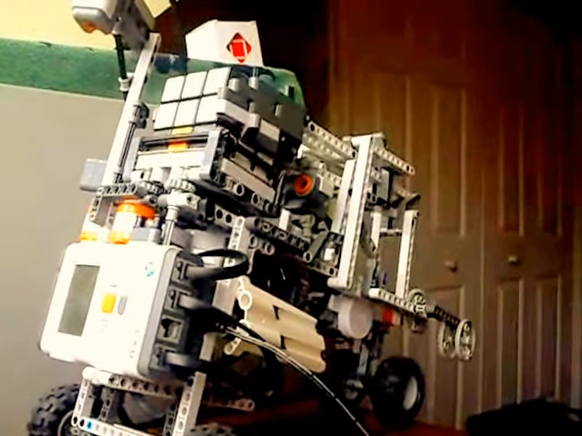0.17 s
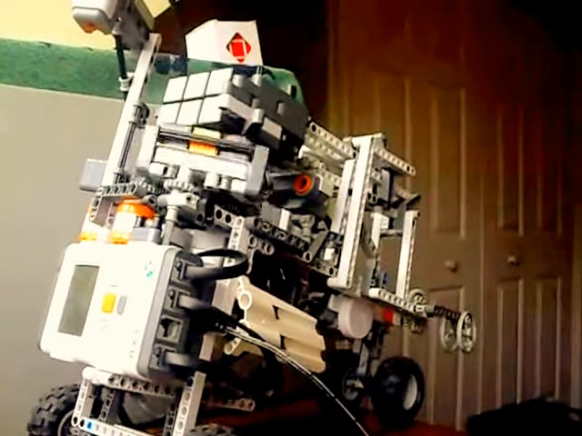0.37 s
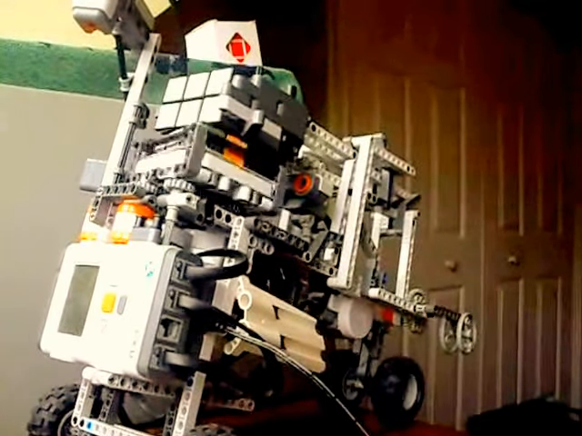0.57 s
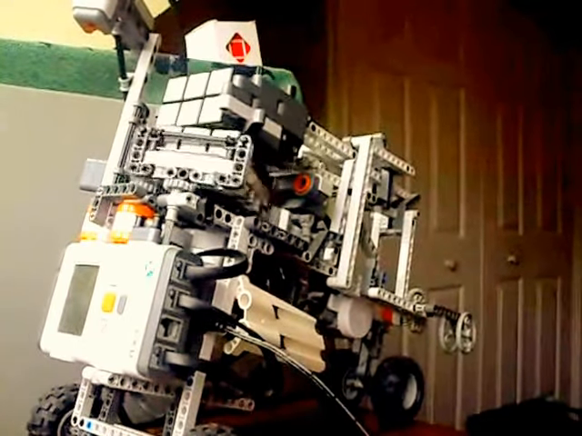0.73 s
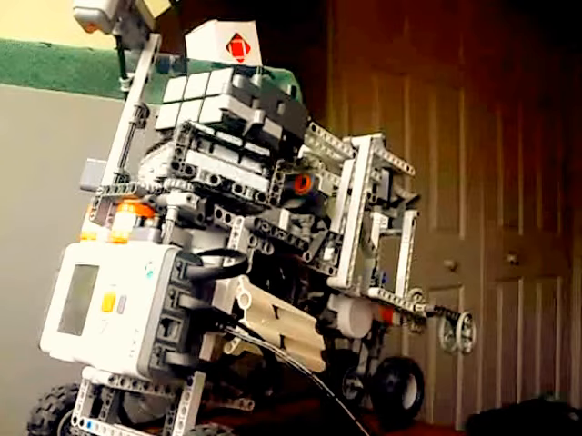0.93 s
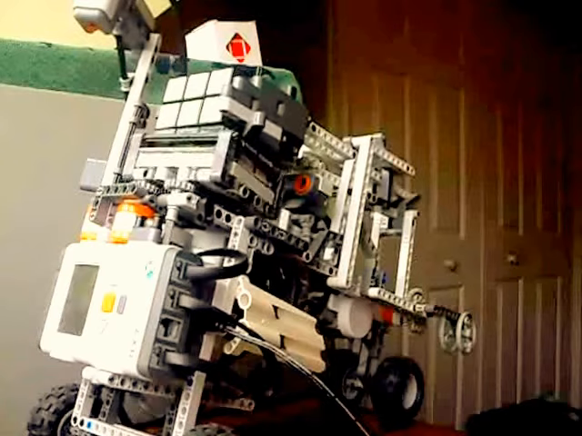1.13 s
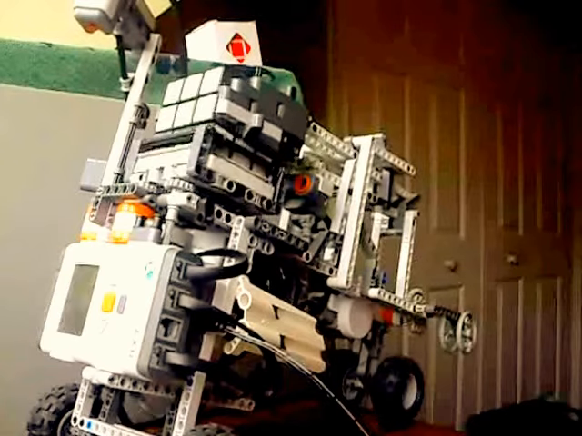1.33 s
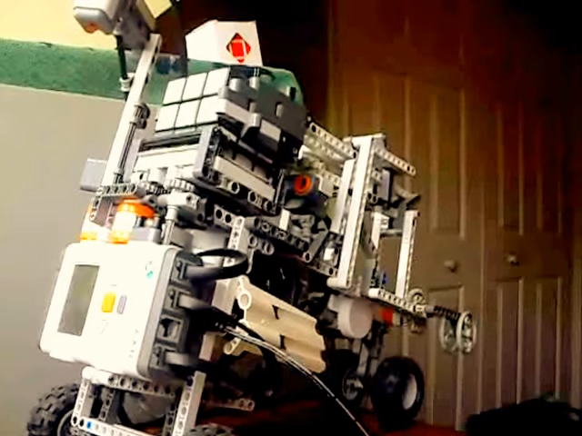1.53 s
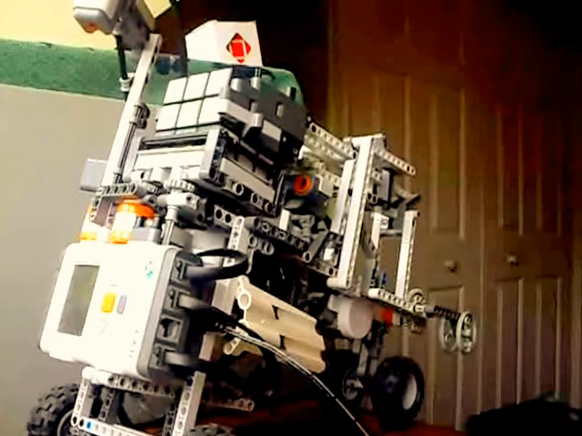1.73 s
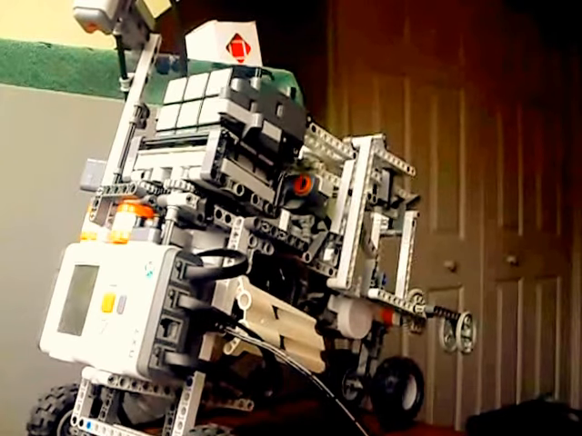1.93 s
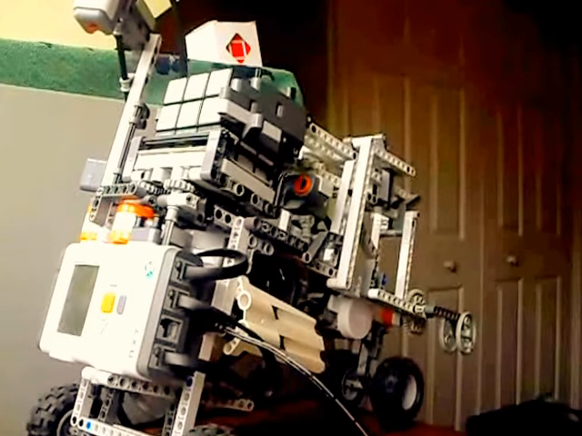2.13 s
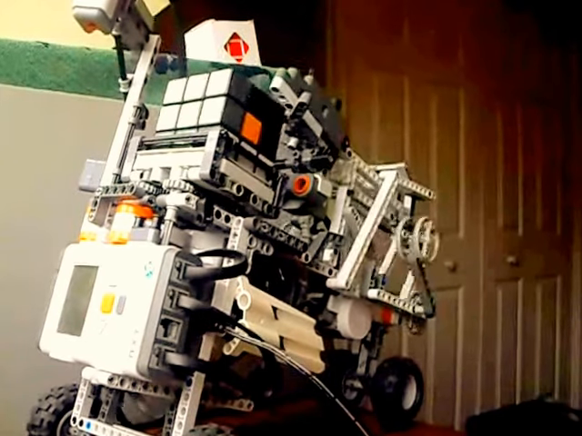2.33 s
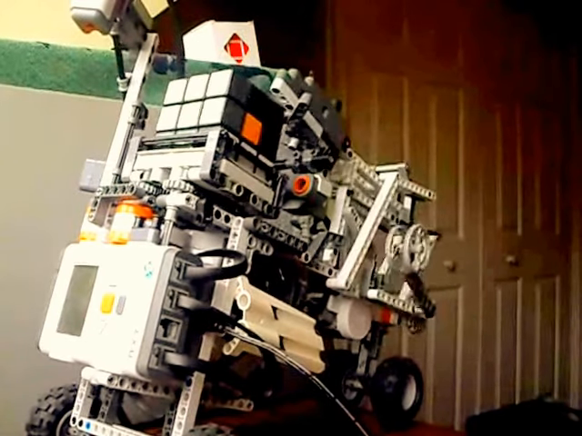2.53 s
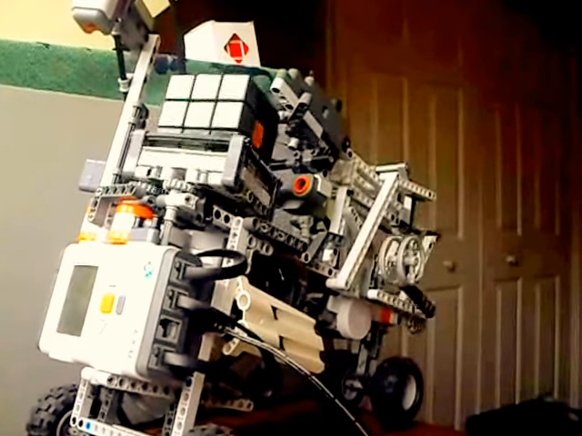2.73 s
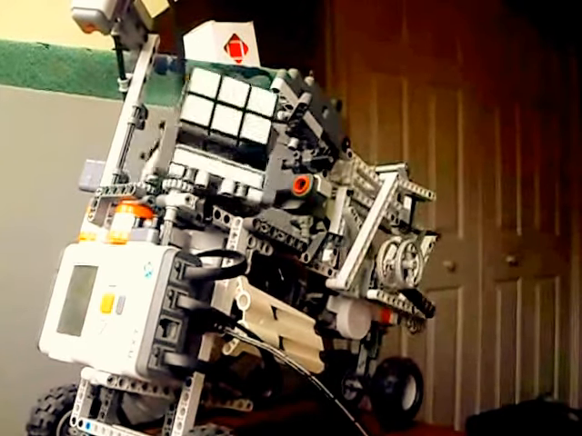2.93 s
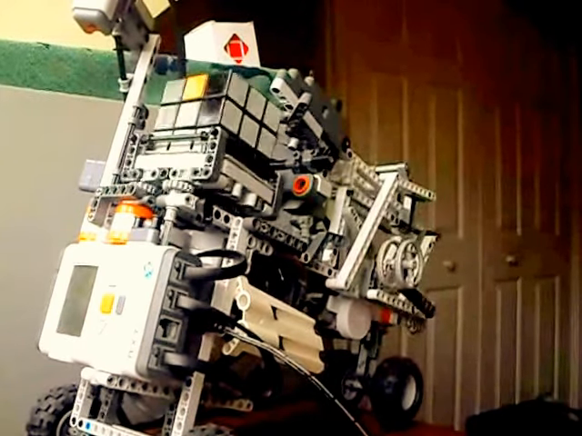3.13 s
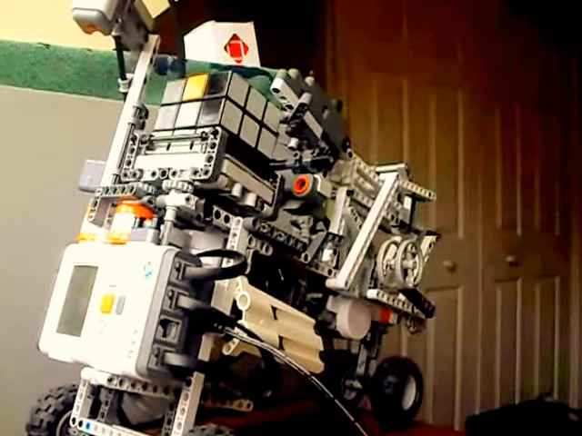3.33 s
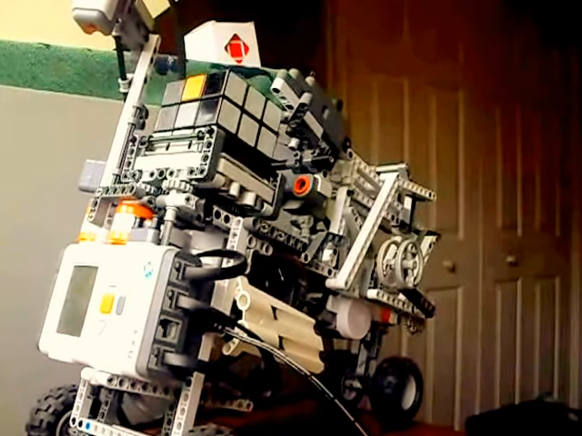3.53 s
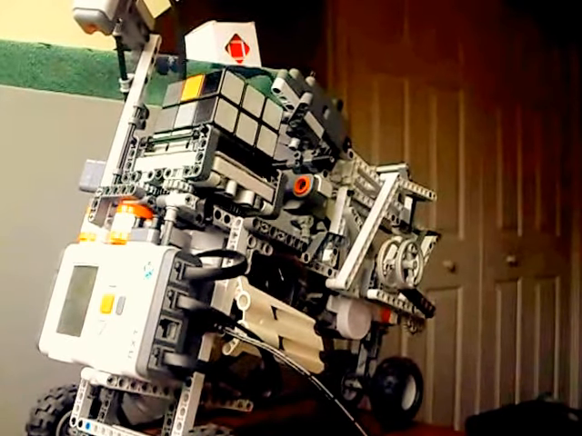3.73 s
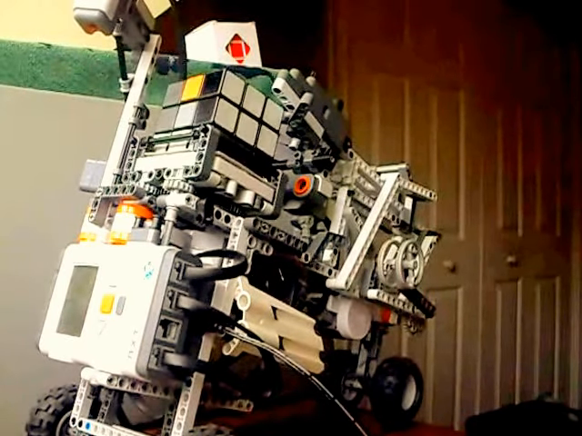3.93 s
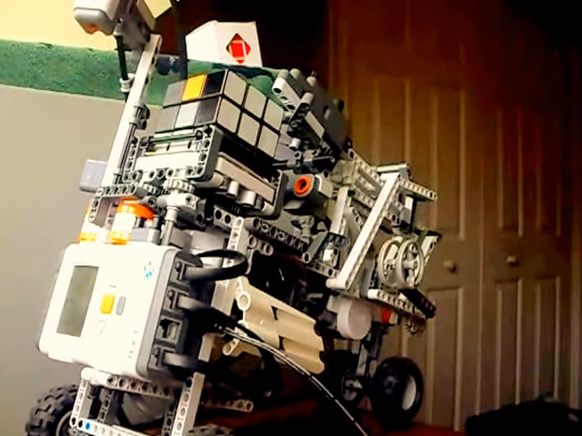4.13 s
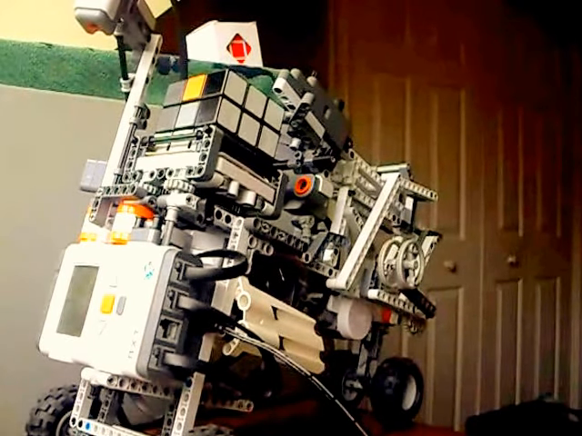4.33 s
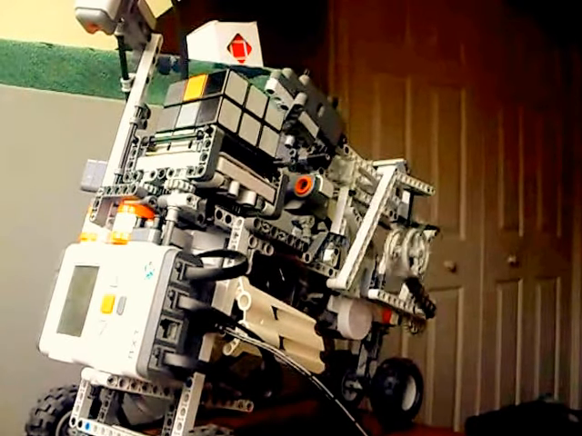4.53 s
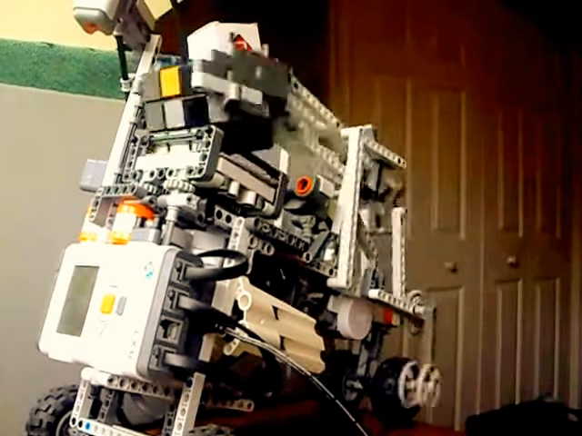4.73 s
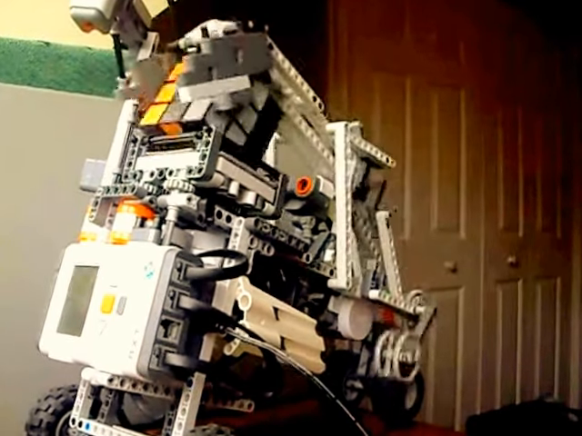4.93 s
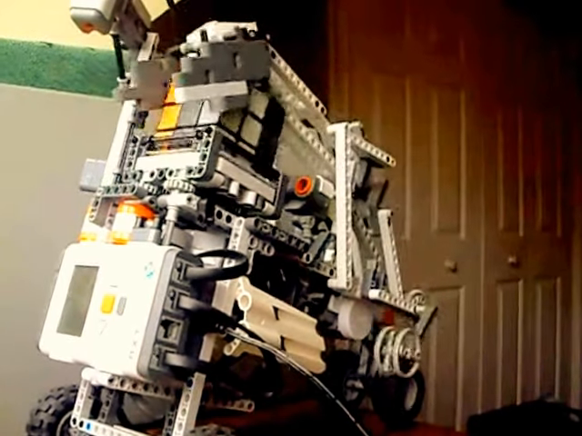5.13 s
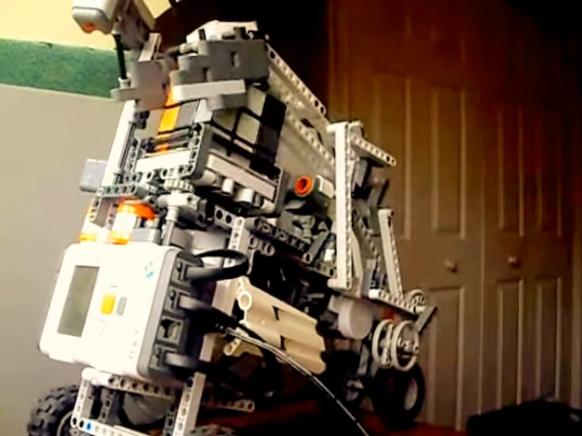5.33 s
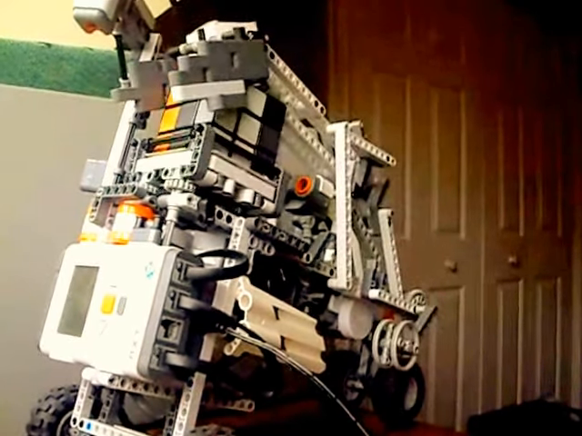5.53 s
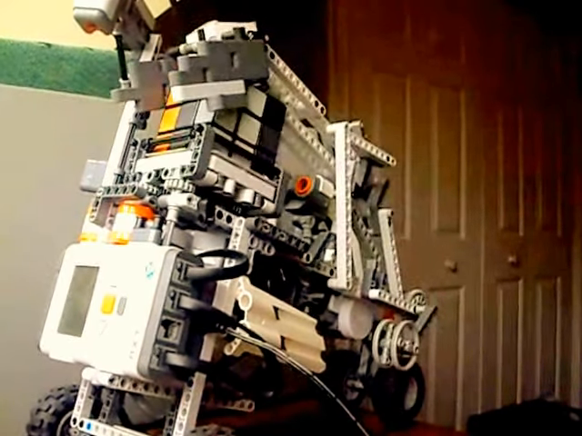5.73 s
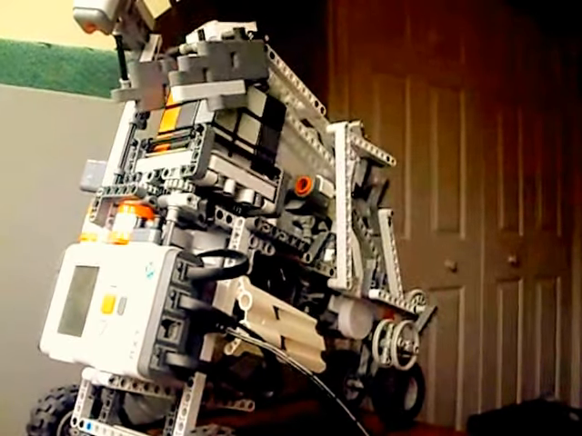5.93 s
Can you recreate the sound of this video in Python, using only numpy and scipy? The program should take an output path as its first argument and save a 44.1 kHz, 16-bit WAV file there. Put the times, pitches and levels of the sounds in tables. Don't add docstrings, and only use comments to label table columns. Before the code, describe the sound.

In a quiet room with a short, dry echo, a close microphone picks up a plastic robot turning a puzzle cube over a low steady hiss. At 0.2 s a small servo starts, rises quickly in pitch and sings with a rattling gear whir, jolting softly near 0.36 and stopping with a light thud around 1.15. Short whirs and clicks follow at 1.2, 1.45 and 1.75; the arm rustles and grinds faintly from 1.95 to 2.6. A second, more rattling and less tonal whir runs from 2.68 to 3.23, with loud clicks at 2.82, 2.87 and 2.96. Faint nudges, ticks and tiny high chirps fill 3.3 to 4.4. From 4.5 to 5.2 the arm grinds harder, with sharp clacks near 4.71 and 5.17 as the cube is tipped and seated. Brief whirs and clicks continue from 5.3, the last and strongest near 6.0.

```python
import sys
import numpy as np
from scipy import signal
from scipy.fft import rfft, irfft
from scipy.io import wavfile
from scipy.ndimage import uniform_filter1d

SR = 44100
rng = np.random.default_rng(int(sys.argv[2]) if len(sys.argv) > 2 else 0)


def bounce(signal):
    frames = np.transpose(np.atleast_2d(signal))
    limited = np.clip(frames, -1, 1)
    pcm = np.round(limited * 32767).astype(np.int16)
    wavfile.write(sys.argv[1], SR, pcm)


def voltage_ratio(level):
    return 10 ** (np.asarray(level, float) / 20)


N = 267246
T = np.arange(N) / SR

# time_s, speed_hz (turns per s), rattle_db
FIRST_RUN = [
    (0.185, 52, -41.5),
    (0.241, 70.6, -33),
    (.29, 84, -32),
    (.36, 91.76, -32.5),
    (0.471, 95.7, -33.5),
    (.69, 97.75, -35.5),
    (.86, 98.6, -35),
    (1.08, 97.13, -34.5),
    (1.147, 96.5, -35.5),
]
SECOND_RUN = [
    (2.687, 59.8, -35.5),
    (2.715, 65.7, -39),
    (2.77, 82.1, -36),
    (2.81, 86.2, -37),
    (2.88, 89.7, -36.5),
    (2.999, 92.6, -36.5),
    (3.14, 95.3, -35.5),
    (3.18, 92.3, -42),
    (3.235, 89.8, -49),
]
# mesh_tone_db, low_housing_db, high_housing_db, growth_db_per_s (of both housing boosts)
RUN_LOADS = [
    (-41.5, 0.3, 5.6, 2),
    (-53, 3, 5.5, 6),
]


def rms_one(x):
    return x / np.sqrt(np.mean(x ** 2) + 1e-20)


def resonate(x, hz, width_hz):
    r = np.exp(-np.pi * width_hz / SR)
    return signal.lfilter([(1 - r * r) / 2, 0, -(1 - r * r) / 2], [1, -2 * r * np.cos(2 * np.pi * hz / SR), r * r], x)


def wander(hz, width_hz):
    return rms_one(resonate(rng.standard_normal(N), hz, width_hz))


def hiss():
    # frequency_hz, level_db
    spectrum = [(8.8, -32), (15, 5.5), (102, -3.5), (366, -12), (778, -18.5), (953, -21), (1470, -25),
                (2630, -30), (2960, -30.5), (3840, -31.5), (4850, -34.5), (13000, -39.5), (15500, -36.5)]
    hz = np.fft.rfftfreq(N, 1 / SR)
    at_hz, at_db = np.transpose(spectrum)
    shape = voltage_ratio(np.interp(np.log(hz + 1e-9), np.log(at_hz), at_db))
    return voltage_ratio(-46) * rms_one(irfft(rfft(rng.standard_normal(N)) * shape, N))


def grains(per_s, spread_db):
    sizes = voltage_ratio(spread_db * np.minimum(rng.exponential(1, N), 4)) * rng.choice([-1, 1], N)
    return rms_one(sizes * (rng.random(N) < per_s / SR)) + 1e-18


def housing(x, body, moves, main_share=1, low_hz=3300, high_hz=5600):
    fine = 0.52 * x + 0.49 * rng.standard_normal(N)
    parts = []
    for k, (hz, width_hz, db) in enumerate(body):
        source = x if hz < 8800 else fine
        parts.append((hz, voltage_ratio(db) * (-1) ** k * resonate(source, hz, width_hz)))
    low = sum(part for hz, part in parts if hz < low_hz)
    low = low + voltage_ratio(-15.5) * resonate(x[::-1], 3350, 450)
    sides = sum(part for hz, part in parts if low_hz <= hz < 3300)
    main = sum(part for hz, part in parts if hz >= 3300)
    high = sum(part for hz, part in parts if hz >= high_hz)
    level, low_gain, high_gain = uniform_filter1d(voltage_ratio(moves), size=120)
    tilted = main_share * (main - high) + low_gain * low + high_gain * (high + sides)
    no_bass = signal.butter(3, 850, "high", fs=SR, output="sos")
    return signal.sosfilt(no_bass, tilted / np.std(main)), level


def short_moves(rows, rise_db, fall_db, looser, low_share, low_db, high_share, high_db):
    out = np.zeros((3, N)) - [[120], [0], [0]]
    for s, rise, fall, db, loose_db in rows:
        at = np.arange(int(s * SR), min(int((s + rise + fall) * SR), N))
        age = T[at] - s - rise
        under_db = rise_db * np.maximum(-age / rise, 0) ** 1.17
        under_db = under_db + fall_db * np.maximum(age / fall, 0) ** 1.26
        boost_db = loose_db + looser * under_db
        move = [db - under_db, low_share * boost_db + low_db, high_share * boost_db + high_db]
        out[:, at] = np.where(move[0] > out[0, at], move, out[:, at])
    return out


def column(rows, index, rest, edge_drop=0):
    clutch_s = .035
    s, value = np.array(rows, float)[:, [0, index]].T
    s = np.r_[s[0] - clutch_s, s, s[-1] + clutch_s]
    value = np.r_[value[0] - edge_drop, value, value[-1] - edge_drop]
    return np.interp(T, s, value, left=rest, right=rest)


def turntable_moves():
    # start_s, rise_s, fall_s, peak_db, looseness_db
    nudges = [(0, 0.015, 0.044, -72, 7), (1.185, 0.083, 0.11, -39.5, 9), (1.41, 0.074, .11, -47, 6.5),
              (1.7, 0.058, 0.054, -38.5, 2.5), (3.285, 0.044, 0.18, -50, 8.5),
              (3.59, 0.079, 0.06, -54, 8.5), (3.82, 0.051, .03, -60.5, 6),
              (4.045, 0.049, 0.039, -48.5, 3.5), (5.3, 0.053, .11, -42.5, 9),
              (5.48, 0.078, 0.044, -38.5, 4.5), (5.63, .005, 0.2, -59.5, 8), (5.81, 0.046, 0.044, -57.5, 7),
              (5.972, 0.048, 0.16, -35.5, 3.5)]
    # rise_db, fall_db, looser_db_per_db (below peak), low_share, low_db, high_share, high_db (housing boosts)
    nudge_shape = (17, 24.5, 0.1729, 0.56, 3.5, 1.177, -1.5)
    out = short_moves(nudges, *nudge_shape)
    for run, (_, low_db, high_db, growth_db) in zip([FIRST_RUN, SECOND_RUN], RUN_LOADS):
        db = column(run, index=2, rest=-120, edge_drop=27)
        grown_db = growth_db * (T - run[0][0])
        out = np.where(db > out[0], [db, low_db + grown_db, high_db + grown_db], out)
    return out


def rotor():
    idle_hz = 46.48
    first, second = [column(run, index=1, rest=idle_hz) for run in (FIRST_RUN, SECOND_RUN)]
    speed = uniform_filter1d(np.maximum(first, second), size=900)
    return speed, np.cumsum(speed) / SR + .001 * wander(30, 60)


def driven(values):
    brake_s = 0.022
    on = 0
    for run, value in zip([FIRST_RUN, SECOND_RUN], values):
        on = on + value * (T > run[0][0]) * (T < run[-1][0] - brake_s)
    return np.abs(uniform_filter1d(on, size=900))


def turntable(speed, turns):
    # frequency_hz, width_hz, level_db
    turntable_body = [(940, 570, -70), (1544, 710, -9.5), (1832, 603, -6), (2550, 1060, -16.5),
                      (2935, 310, -10.5), (3450, 200, -14.5), (3836, 350, -9.5), (4468, 370, 3.5),
                      (4774, 268, 3.5), (5164, 150, -5), (6230, 620, -15), (7210, 127, -13.5),
                      (7870, 570, -19), (9400, 440, -18.5), (10310, 440, -19), (11800, 820, -21.5),
                      (14400, 790, -23.5)]
    knock_shares = [.6, .12]
    cog_angle = 2.7 * turns + .3 * wander(8, 16)
    cogging_db = 2.5 * np.clip((60 - speed) / 10, 0, 1) * np.cos(2 * np.pi * cog_angle)
    eccentric = voltage_ratio(0.5 * np.cos(2 * np.pi * (turns - .1)) + cogging_db)
    blows = 0
    for k in range(28, 56):
        blows = blows + np.cos(2 * np.pi * k * turns) + 0.44 * np.cos(2 * np.pi * k * (turns + 0.28))
    uneven = voltage_ratio(0.3 * wander(45, 75))
    knock = rms_one(resonate(resonate(uneven * blows, 4590, 300), 4590, 300))
    steady = driven(knock_shares) * np.clip((speed - 90) / 6.3, 0, 1) ** 2
    contacts = eccentric * grains(6000, 2.4)
    rattle, level = housing(contacts, turntable_body, turntable_moves(), np.sqrt(1 - steady), low_hz=2100)
    return level * (rattle + np.sqrt(steady) * knock)


def clicks():
    # start_s, peak_db
    slack_clicks = [(0.0183, -40.5), (1.4128, -38), (1.4524, -39), (1.7145, -36), (1.9004, -35.5),
                    (1.9104, -44), (2.6835, -40), (2.8172, -21), (2.8736, -19.5), (2.9596, -20),
                    (3.7893, -39.5), (3.826, -45), (3.938, -41.5), (4.0593, -40), (4.2697, -42),
                    (4.353, -41.5), (4.6044, -38), (4.79, -35), (5.3073, -40.5), (5.3676, -28),
                    (5.475, -28), (5.634, -36), (5.793, -32.5), (5.833, -40), (5.858, -50), (5.866, -44),
                    (5.9743, -38)]
    # start_s, peak_db
    stop_clicks = [(1.1898, -34), (1.956, -38), (3.27, -37.5), (3.5967, -47), (4.0367, -43), (4.219, -39),
                   (4.7466, -32), (4.809, -34), (4.9508, -33.5), (5.1816, -29), (5.316, -36)]
    # start_s, peak_db
    arm_clicks = [(2.173, -45), (2.39, -36), (4.5165, -34.5), (4.526, -38), (4.5497, -44), (4.6917, -35),
                  (4.7095, -23), (4.8314, -46), (4.87, -34), (4.884, -32), (4.9426, -37.5), (5.0608, -34.5),
                  (5.16, -33)]
    # start_s, peak_db
    cube_clicks = [
        (1.6832, -37),
        (1.966, -38),
        (4.7294, -27),
        (4.91, -32.5),
        (5.1692, -23),
    ]
    # ring_hz, tick_db, rattle_db (both relative to the ring)
    click_kinds = [
        (4500, -21, -8.5),
        (4770, -13, -0.5),
        (5890, -9.5, -3),
        (3060, -19, -7),
    ]
    out, t = np.zeros(N + 2000), np.arange(1500) / SR
    rows = []
    for table, kind in zip([slack_clicks, stop_clicks, arm_clicks, cube_clicks], click_kinds):
        rows += [(s, db, *kind) for s, db in table]
    noise = rng.standard_normal((len(rows), len(t)))
    bright = signal.sosfilt(signal.butter(2, [6500, 11500], "band", fs=SR, output="sos"), noise)
    broad = signal.sosfilt(signal.butter(2, [2200, 7000], "band", fs=SR, output="sos"), noise[:, ::-1])
    for (s, db, hz, tick_db, rattle_db), tick, rattle, chance in zip(rows, bright, broad, noise[:, 0]):
        ring = np.sin(2 * np.pi * hz * (1 + 0.017 * chance) * t)
        ring = ring * voltage_ratio(-60 * t / 0.0063) * np.minimum(t / 0.00049, 1)
        rattle = voltage_ratio(rattle_db) * rattle
        crack = 1.8 * voltage_ratio(-60 * t / 0.0016) * rattle
        tick = 1.74 * voltage_ratio(tick_db - 60 * t / 0.0089) * tick
        dying = 0.47 * voltage_ratio(-60 * t / 0.029) * rattle
        out[round(s * SR):][:len(t)] += voltage_ratio(db + 2.5) * (ring + crack + tick + dying)
    return out[:N]


def gear_tones(speed, turns):
    # order (multiple of rotor speed), level_db (relative to the mesh tone, order 20)
    rotor_orders = [(10, -22), (13, -22), (15, -17), (16, -15), (17, -11), (18, -17), (19, -11), (20, 0),
                    (21, -18), (23, -15), (26, -14), (28, -19), (29, -17), (30, -8), (31, -16), (36, -12),
                    (37, -11), (39, -13), (54, -10), (56, -10), (58, -13), (61, -12), (64, -6), (66, -15),
                    (70, -14), (73, -12), (75, -14), (79, -14), (80, -12)]
    locked = np.clip((speed - 89) / 6, 0, 1)
    flicker = [wander(6, 14) for _ in range(5)]
    tones = 0
    for k, db in rotor_orders:
        if k != 20:
            db = db + 1.3 * flicker[k % 5] - 1.34
        if k < 15:
            share = locked
        elif k < 22:
            share = 1
        else:
            share = 0.7 + 0.45 * locked
        tones = tones + voltage_ratio(db) * share * np.sin(2 * np.pi * (k * turns + rng.random()))
    slip = np.exp(-((T - .378) / .008) ** 2)
    engaged = np.clip((speed - 63) / 8, 0, 1) ** 2 * (1 - slip)
    uneven = voltage_ratio(0.55 * wander(27, 36))
    return np.sqrt(2) * engaged * driven([voltage_ratio(load[0]) for load in RUN_LOADS]) * uneven * tones


def thuds():
    # start_s, peak_db, mode_hz
    knocks = [
        (.364, -38, 610),
        (1.131, -33, 1453),
        (2.671, -41, 1763),
        (2.683, -35, 1437),
        (6.031, -40.5, 507),
    ]
    out = np.zeros(N)
    for s, db, hz in knocks:
        t = np.maximum(T - s, 0)
        out += voltage_ratio(db - 60 * t / 0.072) * (1 - np.exp(-t / 0.0029)) * np.sin(2 * np.pi * hz * t)
    return out


def arm():
    # frequency_hz, width_hz, level_db
    arm_body = [(1730, 730, 0.5), (3130, 360, 0.5), (3860, 570, -1), (5160, 1050, -1.5), (5800, 420, 6.5),
                (6300, 1300, -0.5), (8460, 2000, -7), (10000, 630, -4.5), (11400, 1100, -12),
                (15000, 1200, -16)]
    # start_s, rise_s, fall_s, peak_db, looseness_db
    strokes = [(1.95, 0.0053, 0.077, -42.5, -5.5), (2.172, 0.035, 0.18, -43, -1),
               (2.28, 0.023, 0.43, -45, -8), (2.35, 0.061, 0.054, -48, -1.5), (4.514, .034, 0.13, -43, -3),
               (4.55, 0.17, .02, -46, 2), (4.703, 0.0055, 0.14, -33, -2), (4.79, 0.035, 0.074, -35.5, -0.5),
               (4.878, 0.006, 0.092, -36.5, -4), (4.93, 0.017, 0.12, -42.5, -5),
               (5.05, .01, 0.095, -48, -18), (5.146, 0.019, 0.15, -43.5, 1.5)]
    # rise_db, fall_db, looser_db_per_db (below peak), low_share, low_db, high_share, high_db (housing boosts)
    stroke_shape = (13.7, 37, .05, 1.07, 0.1, 0.35, 0.35)
    rattle, level = housing(grains(4500, 4.4), arm_body, short_moves(strokes, *stroke_shape))
    return voltage_ratio(-5.0) * level * rattle


def squeaks():
    # start_s, length_s, start_hz, end_hz, level_db
    whistles = [
        (3.922, .016, 8400, 8300, -56),
        (4.272, .018, 8600, 8300, -51),
        (4.287, .016, 8200, 8100, -56),
        (4.318, .016, 8150, 8100, -64),
        (4.535, .075, 8100, 8100, -63),
        (4.62, .06, 8100, 8100, -63),
        (4.964, .022, 8300, 8250, -54),
    ]
    out, waver = np.zeros(N), wander(60, 120)
    for s, length, start_hz, end_hz, db in whistles:
        part = np.clip((T - s) / length, 0, 1)
        pitch_hz = start_hz + (end_hz - start_hz) * part + 40 * waver
        swell = np.sin(np.pi * part ** 0.63)
        out += voltage_ratio(db + 4.5 * waver) * swell * np.sin(2 * np.pi * np.cumsum(pitch_hz) / SR)
    return out


def room(x):
    t60_s, tail_db, first_reflection_s = 0.11, -9, .003
    t = np.arange(SR // 2) / SR
    dull = signal.lfilter([.6], [1, -.4], rng.standard_normal(len(t)))
    tail = dull * voltage_ratio(-60 * t / t60_s) * (t > first_reflection_s)
    return voltage_ratio(tail_db) * signal.fftconvolve(x, tail / np.linalg.norm(tail))[:N]


def scene():
    speed, turns = rotor()
    robot = turntable(speed, turns) + arm() + clicks() + thuds() + squeaks()
    return (robot + room(robot) + gear_tones(speed, turns) + hiss())[None]


def band_limit(x):
    return signal.sosfilt(signal.butter(12, 15630, fs=SR, output="sos"), x)


def record(dry):
    low_pass = signal.cheby2(12, 60, 16050, fs=SR, output="sos")
    return band_limit(signal.sosfilt(low_pass, dry))


dry = scene()
out = record(dry)
bounce(out)
```